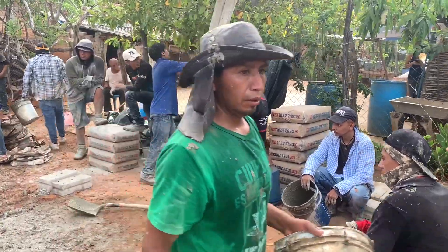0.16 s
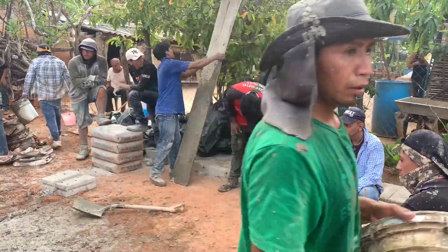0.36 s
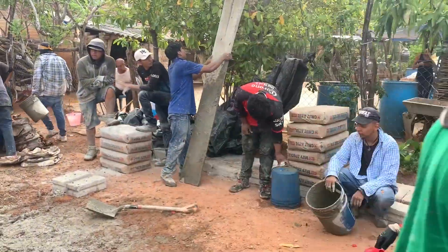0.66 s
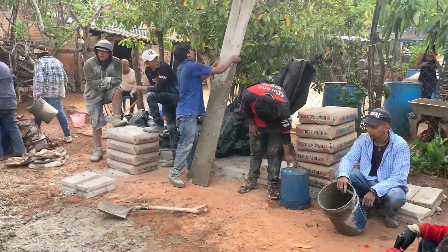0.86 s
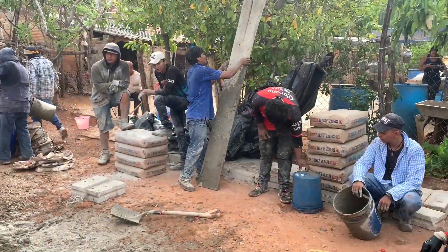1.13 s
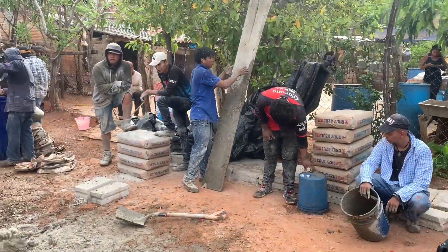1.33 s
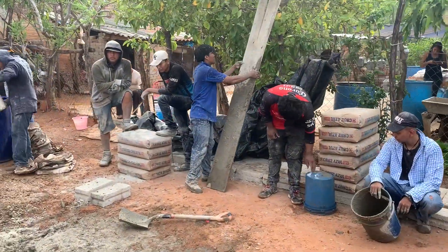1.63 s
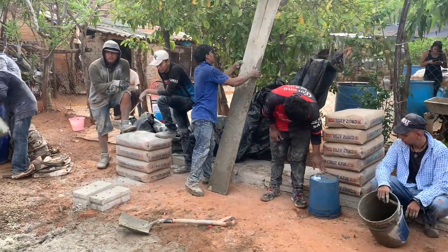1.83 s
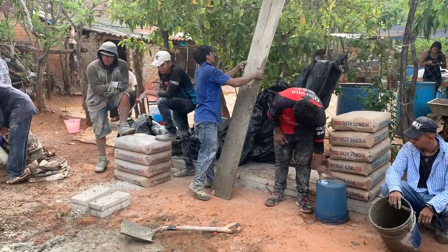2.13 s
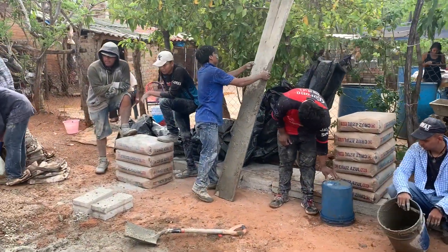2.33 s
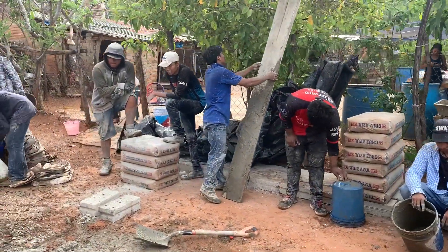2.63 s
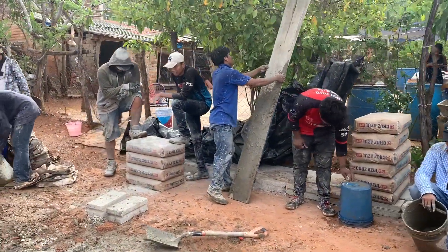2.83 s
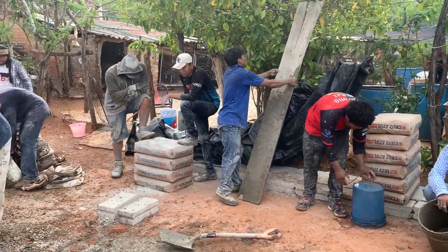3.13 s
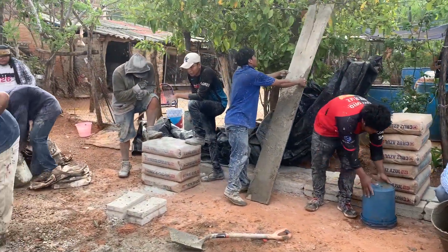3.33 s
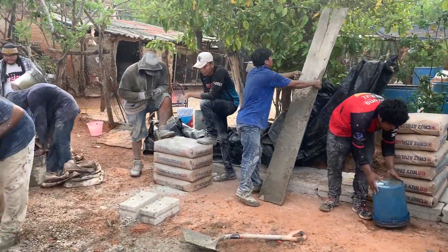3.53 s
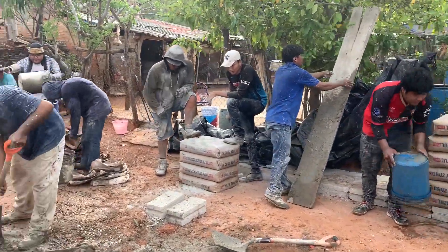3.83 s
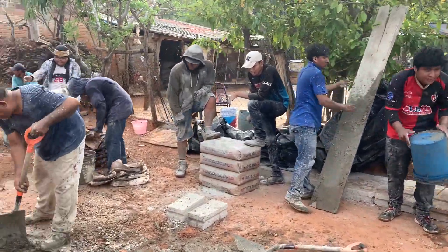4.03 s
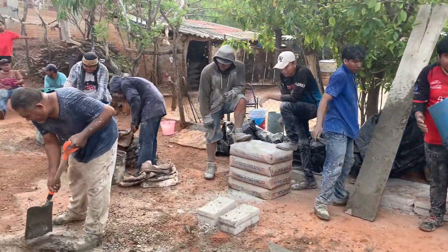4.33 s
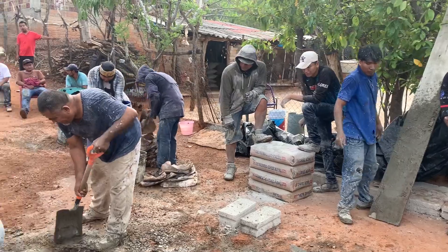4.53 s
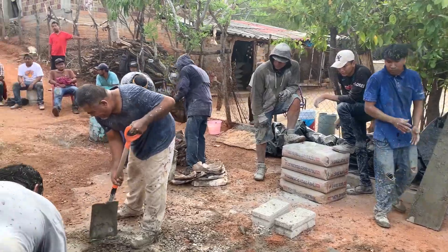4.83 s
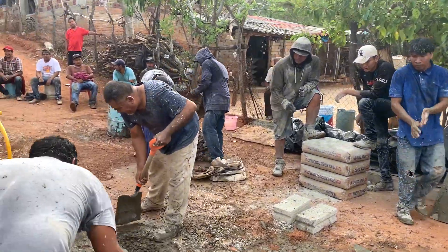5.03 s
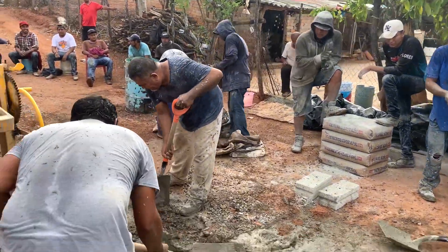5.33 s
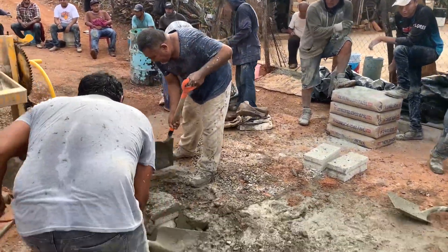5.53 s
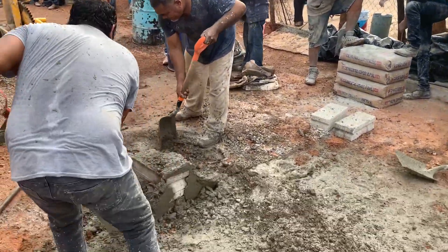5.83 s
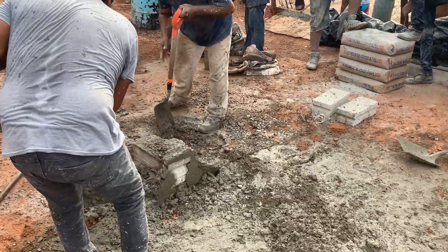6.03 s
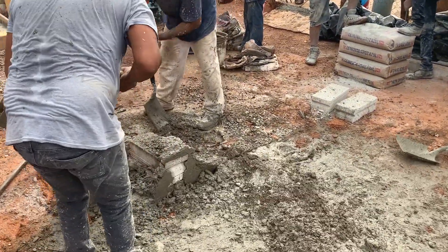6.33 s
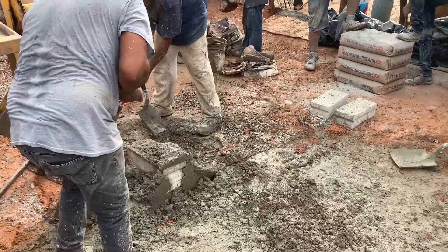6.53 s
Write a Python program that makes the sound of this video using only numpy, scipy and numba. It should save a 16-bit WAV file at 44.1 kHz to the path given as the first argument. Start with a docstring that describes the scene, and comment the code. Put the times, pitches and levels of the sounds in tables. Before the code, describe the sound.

Close shovelling in wet concrete mix on open ground: a short scrape, a pause, then crackling clusters of grit, clicking stones and damped blade clanks. Long rough drags follow, then very sharp stone cracks, a soft low slump of mix, and a few last chops. An engine and rotating drum drone evenly underneath. Captured on a phone in stereo, dry, with loud strokes briefly pushing the level down.

```python
"""Shovels in wet gravel mix

Steel shovels scrape and chop through gravel on bare ground; a mixer's engine drones to one side.
Scrapes are grainy noise in blade and grit colours, stones are short bursts, chops drive damped blade modes.
Engine, drum and heap are shaped noise. The bass is alike in both channels; the shovels' channel lag
shrinks as a phone turns toward them, and its gain control ducks loud moments.
"""
import sys
import numpy as np
from scipy import signal
from scipy.fft import rfft, irfft, next_fast_len
from scipy.io import wavfile
from scipy.ndimage import uniform_filter1d, minimum_filter1d, map_coordinates
from numba import njit

SR = 44100
rng = np.random.default_rng(int(sys.argv[2]) if len(sys.argv) > 2 else 0)


def to_wav(s):
    """Save 16-bit WAV."""
    ch = np.atleast_2d(s).T  # columns
    pcm = np.round(np.clip(ch, -1, 1) * 32767)  # PCM
    wavfile.write(sys.argv[1], SR, pcm.astype(np.int16))


N = 293706

# Engine loudness. Each row: time in seconds, relative level in dB.
ENGINE_DB = [(0, -41.5), (1.5, -42), (2.5, -42), (3.6, -43), (4.04, -41), (4.3, -42.5), (5.14, -40.5),
             (5.5, -41.5), (6.66, -42)]
# Ground rumble. Each row: time in seconds, level in dB.
RUMBLE_DB = [(0, -51), (.9, -48.5), (1.74, -42), (2.2, -52.5), (3.8, -50), (4.2, -49), (4.75, -51),
             (5.2, -46), (5.53, -49), (6.66, -53)]
# Rumble spectrum. Each row: frequency in Hz, relative density in dB per Hz.
GROUND_SPECTRUM = [(20, -34), (40, -11.5), (58, 0), (66, -0.5), (76, 2.5), (95, -7), (120, -41)]
# Exhaust spectrum. Each row: frequency in Hz, relative density in dB per Hz.
EXHAUST_SPECTRUM = [(56, -43), (95, -3), (129, 1), (172, -6), (236, -4), (400, -13.5), (520, -26.5),
                    (880, -120)]
# Exhaust pipe resonances. Each row: frequency in Hz, width in Hz, relative level in dB.
PIPE_MODES = [(117, 27, -0.5), (234, 27, 0.5)]
# Drum spectrum. Each row: frequency in Hz, relative density in dB per Hz.
DRUM_SPECTRUM = [(160, -20), (280, -11.5), (444, 1), (476, -2.5), (563, 1.5), (648, 0), (766, -7),
                 (906, -1), (1100, -2.5), (1280, -1.5), (2150, -20.5), (3610, -19.5), (7900, -41.5),
                 (10300, -76), (17400, -120)]
# Drum shell resonances. Each row: frequency in Hz, width in Hz, relative level in dB.
SHELL_MODES = [(515, 49, 3.5), (585, 220, -1.5), (790, 45, 3), (990, 41, 5), (1081, 68, 4), (1662, 11, 7.5),
               (1560, 49, -26), (2130, 22, 14), (2150, 38, 11)]
# Drum resonances that come forward as the phone turns. Each row: frequency in Hz, width in Hz, relative level in dB.
MOUTH_MODES = [(346, 87, -3), (779, 28, 3)]
# Gain of those resonances. Each row: time in seconds, gain in dB.
FACING_DB = [(0, -20), (3.5, -12), (4.3, -1.5), (5.5, 0.5), (6.66, 3.5)]
SURGE_DB = 0.4

# Heavy loads landing on the heap. Each row: start in seconds, relative level in dB.
DUMPS = [(5.098, -36.5), (5.172, -33.5)]
# Heap spectrum. Each row: frequency in Hz, relative density in dB per Hz.
HEAP_SPECTRUM = [(60, -30), (130, -2), (380, -4), (800, -10), (1500, -30)]
DUMP_RISE_S, DUMP_T60_S = 0.008, 0.29

# Farther shovelling. Each row: time in seconds, then relative levels in dB of grit, blade and load.
FAR_DB = [(0, -40, -58, -58), (.37, -49.5, -69.5, -63), (.62, -48, -66, -59), (.9, -47.5, -57, -49.5),
          (1.24, -50.5, -66, -57.5), (1.5, -45.5, -49.5, -44.5), (1.74, -47, -56, -50),
          (2.15, -40.5, -57, -57), (2.55, -50.5, -60, -49), (2.9, -48.5, -62.5, -56.5),
          (3.62, -47.5, -61, -50), (3.95, -38, -55, -50), (4.2, -48.5, -60, -45.5), (4.45, -45, -64, -53.5),
          (4.98, -49, -58.5, -53), (5.4, -46.5, -60, -53), (5.95, -46.5, -57.5, -49), (6.2, -42, -63, -57),
          (6.66, -47.5, -63.5, -55)]
# Shovel scrapes. Each row: start and end in seconds, relative grit level in dB at start and at end,
# blade level in dB over the grit, load level in dB over the grit.
SCRAPES = [(0.0, 0.078, -31.5, -53, -22, -21), (0.132, 0.16, -33, -35, -22, -36),
           (0.394, 0.454, -28.5, -26.5, -24, -21.5), (0.468, 0.574, -24, -35.5, -21.5, -23.5),
           (0.81, 0.843, -40, -35.5, -9, -10.5), (1.47, 1.473, -42, -33, -18, -8),
           (1.5, 1.67, -46, -58, -11, 3.5), (1.792, 1.89, -37, -34.5, -12, -8.5),
           (1.888, 1.94, -29, -29, -14.5, -13), (1.962, 1.99, -37.5, -35, -13, -13.5),
           (2.003, 2.03, -28, -27.5, -16, -16), (2.048, 2.07, -23.5, -26, -18.5, -21.5),
           (2.188, 2.238, -32, -28, -18, -21), (2.248, 2.383, -34.5, -37.5, -16.5, -16),
           (2.405, 2.429, -37, -37, -19, -24), (2.451, 2.47, -28.5, -39, -16, -28),
           (2.941, 3.064, -32.5, -30.5, -18, -21), (3.079, 3.243, -32.5, -30, -16.5, -13.5),
           (3.262, 3.277, -28, -29, -12.5, -14), (3.285, 3.315, -24, -23.5, -15.5, -15.5),
           (3.327, 3.388, -26, -25.5, -16, -15), (3.394, 3.509, -25, -25, -15, -17.5),
           (3.525, 3.567, -25, -33, -14.5, -11.5), (3.66, 3.735, -36.5, -31.5, -20, -18),
           (3.772, 3.785, -29, -25.5, -22, -25), (3.802, 3.825, -23.5, -22, -20, -24),
           (3.834, 3.883, -24, -28.5, -18.5, -23), (4.473, 4.524, -36, -28, -35, -34),
           (4.54, 4.582, -27, -28, -30, -36), (4.612, 4.632, -27, -30, -24, -30),
           (4.653, 4.7, -31.5, -28.5, -22, -34), (4.707, 4.736, -24, -24, -16.5, -19),
           (4.745, 4.795, -24, -22.5, -15.5, -15), (4.808, 4.835, -24.5, -32, -10.5, -13),
           (4.851, 4.886, -34.5, -42.5, -7.5, -10), (4.906, 4.958, -32.5, -51, -8, -8),
           (5.095, 5.142, -25.5, -27, -19.5, -13), (5.176, 5.215, -28.5, -35, -11, -10.5),
           (5.218, 5.298, -35, -39, -12, -9.5), (5.674, 5.732, -38, -35, -40, -32),
           (5.74, 5.768, -39, -32.5, -18, -13), (5.789, 5.85, -36, -42.5, -27, -26),
           (6.128, 6.159, -37, -36, -37, -36)]
# Rows: grit, blade, load.
BITE_DB_PER_S, LIFT_DB_PER_S = [[1600], [1300], [1000]], [[740], [800], [500]]

# Loud stones struck by the blade. Each row: time in seconds, relative peak in dB.
STONES = [(0.1287, -30), (0.395, -27), (0.4, -21), (0.477, -17), (0.825, -26), (1.4815, -27), (1.534, -29),
          (1.875, -18), (1.901, -18), (1.9325, -24), (2.0055, -17.5), (2.019, -19), (2.062, -23),
          (2.07, -25), (2.112, -23), (2.1293, -32), (2.1926, -19.5), (2.206, -24), (2.2265, -21),
          (2.2785, -24), (2.351, -21), (2.4444, -21), (2.9438, -26), (2.954, -30), (2.988, -22),
          (2.990, -20), (3.084, -18), (3.116, -21), (3.1597, -21), (3.2, -24), (3.207, -16), (3.262, -27),
          (3.288, -15), (3.386, -16), (3.451, -22), (3.4985, -14), (3.512, -18), (3.678, -23),
          (3.6833, -25), (3.764, -16), (3.796, -19), (3.8005, -21), (3.8155, -12), (3.8198, -11),
          (3.8223, -8.5), (3.824, -4), (3.8446, -12), (3.853, -22), (3.8585, -16), (3.872, -14),
          (3.9653, -26), (4.184, -32.5), (4.3427, -29), (4.4347, -24), (4.478, -20), (4.4925, -26),
          (4.505, -18), (4.5088, -8.5), (4.512, -17), (4.5625, -19), (4.570, -14), (4.578, -20),
          (4.597, -25), (4.612, -23), (4.621, -21), (4.658, -19), (4.7075, -12), (4.717, -16),
          (4.7614, -8.5), (4.7645, -18), (4.7795, -20), (4.8413, -24), (4.8856, -25), (4.9053, -26),
          (4.908, -22), (5.088, -20), (5.105, -14.5), (5.1414, -18), (5.2286, -22), (5.6748, -15.5),
          (5.684, -25), (5.703, -21), (5.7414, -19), (5.7517, -20), (5.7569, -18), (5.7587, -10)]
STONE_T60_S, STONE_RISE_S, SNAP_T60_S = 0.022, 0.00018, 0.005
SNAP_DB = 6  # first crack over the rattle
STONE_DULL_DB = -10  # a stone rings the blade less than the scrape does
STONE_DARK_DB = 2  # coarse part of a stone over its fine part
PEBBLES, PEBBLE_DB, PEBBLE_SPREAD_DB = 260, -2.5, 2.5  # offset and spread over the grit of the moment

# Grit spectrum. Each row: frequency in Hz, relative density in dB per Hz.
GRIT_SPECTRUM = [(7850, -79), (8050, -0.5), (9500, 2), (11000, 3), (13000, 2.5), (15000, -0.5),
                 (15700, -5.5), (16300, -58)]
# Grain fineness. Each row: time in seconds, fine grains over coarse ones in dB.
FINENESS_DB = [(0, -1), (.5, 1), (1.3, -3), (1.8, 2.5), (2.3, 1.5), (2.8, -1.5), (3.1, 1.5), (3.8, -5.5),
               (4.6, -2), (5.2, -1), (5.8, -1), (6.66, -3.5)]

# Blade spectrum. Each row: frequency in Hz, relative density in dB per Hz.
BLADE_SPECTRUM = [(2200, -63), (2900, 0), (3500, 7), (4500, 3.5), (5500, 4.5), (7900, 5.5), (8050, -57)]
# Load sliding on the blade. Each row: frequency in Hz, relative density in dB per Hz.
PAN_SPECTRUM = [(250, -21), (900, -1.5), (1350, 2), (1700, 0.5), (2300, 1), (2800, -4), (3600, -11.5)]
# Blade resonances under the load. Each row: frequency in Hz, width in Hz, relative level in dB.
SING_MODES = [(1070, 140, 0.5), (1590, 22, 3.5), (1750, 100, 1), (3065, 115, -0.5), (4330, 290, 1.5)]
# Turn of the phone. Each row: time in seconds, lag of the right port for the blade in ms.
TURN_MS = [(0, 0.3), (2, 0.28), (3.1, 0.27), (3.85, 0.19), (4.7, 0.1), (5.2, 0.047), (6.66, 0.018)]
GRAIN_DB = 1.8  # grain unevenness of the scraping noise
PATCHY_DB = 2.6  # random time-frequency unevenness of its spectrum

# Blade edge hitting the ground. Each row: time in seconds, relative level in dB.
CHOPS = [(1.975, -33), (2.004, -29), (2.193, -35), (2.445, -34), (2.533, -40), (3.084, -25.5), (3.147, -29),
         (3.1735, -23), (3.289, -25), (3.5, -33), (3.7645, -34), (3.823, -25), (3.873, -33), (4.423, -32),
         (4.4935, -32), (4.626, -31), (4.708, -26), (4.759, -23), (4.779, -26), (4.9065, -28), (4.991, -35),
         (5.0885, -36), (5.1406, -19.5), (5.181, -28), (5.198, -33), (5.6754, -26.5), (5.742, -36),
         (5.7584, -22), (5.8012, -38), (5.953, -33), (6.019, -31)]
# Damped blade modes. Each row: nominal frequency in Hz, relative level in dB, T60 in seconds.
STEEL_MODES = [(1435, -1, 0.04), (1585, -4, 0.04), (1705, 5, 0.045), (2270, 0, 0.018), (2950, -1, 0.013),
               (3790, -1, 0.02), (4600, -5, 0.018)]
CRUNCH_T60_S, CRUNCH_RISE_S, CRUNCH_DB, RING_DB = 0.05, 0.00062, -8, -13
TICK_T60_S, TICK_DB = 0.009, 10  # first touch of steel on stone, over the crunch

# Dragged edge sets the blade singing. Each row: start and end in seconds, relative level in dB.
RASPS = [(3.465, 3.56, -45), (4.708, 4.8, -43), (6.017, 6.04, -45)]
RASP_HZ, RASP_WIDTH_HZ = 1680, 220

TOP_HZ = 16400  # band limit


def amp(db):
    """Amplitude ratio of a level in dB."""
    return 10 ** (np.asarray(db) / 20)


def unit(x):
    """x scaled to RMS 1."""
    return x / np.sqrt(np.mean(x ** 2) + 1e-20)


def along(points, hz):
    """Levels in dB between (Hz, dB) points on a log axis, -120 dB outside."""
    point_hz, point_db = np.transpose(points)
    return np.interp(np.log(hz + 1), np.log(point_hz + 1), point_db, -120, -120)


def curves(rows):
    """One value per sample for each column after the time."""
    time_s, *columns = np.transpose(rows)
    return [np.interp(np.arange(N) / SR, time_s, column) for column in columns]


def wobble(rate_hz):
    """A smooth random curve with rate_hz knots a second."""
    knots = rng.standard_normal(int(N * rate_hz / SR) + 4)
    return map_coordinates(knots, [np.arange(N) * rate_hz / SR])


def filtered(x, response):
    """x times a response of frequency."""
    m = next_fast_len(N + 8192)
    return irfft(rfft(x, m) * response(np.fft.rfftfreq(m, 1 / SR)), m)[..., :N]


def colour(points):
    """A spectrum response scaled to mean power 1 over the frequency bins."""
    return lambda hz: amp(along(points, hz)) / np.sqrt(np.mean(amp(2 * along(points, hz))))


def resonant(spectrum, modes, base):
    """A broad spectrum with resonances standing on a base power."""
    def response(hz):
        peaks = sum(amp(2 * db) / (1 + (2 * (hz - c) / width) ** 2) for c, width, db in modes)
        return amp(along(spectrum, hz)) * np.sqrt(base + peaks)
    return response


def ports(noises, lag_ms, twist_rad, share, patchy_db):
    """Two ports: alike in the bass, above it phase-shifted and partly unrelated, with a patchy spectrum."""
    hz, t, (direct, a, b) = signal.stft(noises, SR, nperseg=512)
    patches = uniform_filter1d(rng.standard_normal(a.shape), size=5, axis=0)
    patches = amp(patchy_db * unit(uniform_filter1d(patches, size=7, axis=1)))
    apart = np.clip((hz[:, None] - 600) / 850, 0, 1) ** 2.82
    lag_s = np.interp(t, np.arange(N) / SR, lag_ms) / 1000
    half_rad = apart * (np.pi * hz[:, None] * lag_s + twist_rad / 2)
    stray = np.clip(share, 0, 1) * apart
    mid = np.sqrt(1 - stray) * np.cos(half_rad) * direct + np.sqrt(stray / 2) * a
    side = np.sqrt(1 - stray) * np.sin(half_rad) * 1j * direct + np.sqrt(stray / 2) * b
    left_right = [(mid + side) * patches, (mid - side) * patches]
    return signal.istft(left_right, SR, nperseg=512)[1][:, :N]


def rumble(surge):
    """Ground rumble: low noise in the ground's spectrum."""
    ground = surge * filtered(rng.standard_normal(N), colour(GROUND_SPECTRUM))
    return amp(curves(RUMBLE_DB)[0]) * unit(ground)


def exhaust(surge):
    """Exhaust: steady noise in the resonances of the pipe."""
    noise = rng.standard_normal(N)
    pipe = surge * filtered(noise, resonant(EXHAUST_SPECTRUM, PIPE_MODES, base=0.27))
    return amp(curves(ENGINE_DB)[0] + 1.0) * unit(pipe)


def drum(surge):
    """Load tumbling in the steel drum: noise pulsing with the firing rate rings the shell."""
    firing_hz = 21.0 + 1.2 * wobble(2.3)
    firing = 1 + 0.051 * np.sin(2 * np.pi * np.cumsum(firing_hz) / SR)
    tumble = surge * firing * amp(1.2 * wobble(200))
    load = tumble * rng.standard_normal((2, 3, N))
    shell = filtered(load[0], resonant(DRUM_SPECTRUM, SHELL_MODES, base=0.35))
    mouth = filtered(load[1], resonant([(20, 0), (20000, 0)], MOUTH_MODES, base=0))
    both = unit(shell + amp(curves(FACING_DB)[0]) * mouth)
    lag_ms = np.full(N, .42)
    return ports(amp(curves(ENGINE_DB)[0]) * both, lag_ms, twist_rad=-0.19, share=0.14, patchy_db=1.34)


def engine():
    """Mixer: exhaust, ground rumble and drum share one slight surge in level."""
    surge = amp(SURGE_DB * wobble(9))
    return exhaust(surge) + rumble(surge) + drum(surge)


def dumps():
    """Wet mix slumps onto the heap: low noise that swells fast and dies away."""
    swell = np.zeros(N)
    for start_s, db in DUMPS:
        since_s = np.arange(N) / SR - start_s
        rise = 1 - np.exp(-np.maximum(since_s, 0) / DUMP_RISE_S)
        swell += amp(db - 60 * np.abs(since_s) / DUMP_T60_S) * rise
    return swell * unit(filtered(rng.standard_normal(N), colour(HEAP_SPECTRUM)))


def strokes():
    """Grit, blade and load levels in dB: each scrape bites, drags and lifts over the farther work."""
    t, power = np.arange(N) / SR, amp(2 * np.array(curves(FAR_DB)))
    for start, end, first_db, last_db, blade_db, load_db in SCRAPES:
        near = slice(max(round((start - .1) * SR), 0), round((end + .3) * SR))
        share = np.clip((t[near] - start) / (end - start), 0, 1)
        drag_db = first_db + (last_db - first_db) * share + [[0], [blade_db], [load_db]]
        drag_db -= BITE_DB_PER_S * np.maximum(start - t[near], 0)
        drag_db -= LIFT_DB_PER_S * np.maximum(t[near] - end, 0)
        power[:, near] += amp(2 * drag_db)
    return 10 * np.log10(power)


def cracks(times_s, peak_db):
    """Envelope of struck stones: a sharp snap, a short rattle."""
    t = np.arange(SR // 20) / SR
    blows = np.bincount((times_s * SR).astype(int), amp(peak_db), N)
    decay = amp(-60 * t / SNAP_T60_S) + amp(-SNAP_DB - 60 * t / STONE_T60_S)
    shape = decay * (1 - np.exp(-t / STONE_RISE_S))
    return signal.fftconvolve(blows, shape / shape.max())[:N]


def struck_stones(grit_db):
    """Envelope of the loud stones and of small ones at chance moments, mostly weak."""
    when, size = rng.random((PEBBLES, 2)).T
    pebble_db = grit_db[(when * N).astype(int)] + PEBBLE_DB - PEBBLE_SPREAD_DB * np.log(1 - size)
    return cracks(*np.transpose(STONES)) + cracks(when * N / SR, pebble_db)


def chops():
    """The edge crushes gravel; the crunch drives the damped blade at new strengths each blow."""
    out, t = np.zeros(N + SR), np.arange(SR // 10) / SR
    for start_s, db in CHOPS:
        ring = np.zeros(len(t))
        for hz, mode_db, t60_s in STEEL_MODES:
            chance = rng.standard_normal()
            tone = np.sin(2 * np.pi * hz * (1 + 0.031 * chance) * t)
            ring += amp(mode_db + 2 * chance - 60 * t / t60_s) * tone
        decay = amp(-60 * t / CRUNCH_T60_S) + amp(TICK_DB - 60 * t / TICK_T60_S)
        crunch = decay * (1 - np.exp(-t / CRUNCH_RISE_S)) * np.sign(rng.standard_normal(len(t)))
        rung = signal.fftconvolve(crunch, ring)[:len(t)] / np.linalg.norm(crunch)
        out[round(start_s * SR):][:len(t)] += amp(db + RING_DB) * rung + amp(db + CRUNCH_DB) * crunch
    return out[:N]


def rasps():
    """Rough noise in one blade resonance while the edge drags."""
    t, drag = np.arange(N) / SR, np.zeros(N)
    for start, end, db in RASPS:
        fade_db = LIFT_DB_PER_S[2][0] * np.maximum(t - end, 0)
        drag += amp(db - fade_db) * (t > start)
    sing = lambda hz: 1 / (1 + (2 * (hz - RASP_HZ) / RASP_WIDTH_HZ) ** 2)
    return drag * unit(filtered(rng.standard_normal(N), sing))


def edge_band(hz):
    """Response for chops and rasps: weak below 1200 Hz and above 6000 Hz."""
    return (hz / 1200) ** 2 / (1 + (hz / 1200) ** 2) / (1 + (hz / 6000) ** 4)


def blade(dull, load):
    """Steel blade: scrape and load noise through its resonances, plus chops and rasps."""
    steel = filtered(dull * rng.standard_normal((3, N)), colour(BLADE_SPECTRUM))
    steel += filtered(load * rng.standard_normal((3, N)), colour(PAN_SPECTRUM))
    steel = filtered(steel, resonant([(20, 0), (20000, 0)], SING_MODES, base=0.67))
    steel[0] += filtered(chops() + rasps(), edge_band)
    return ports(steel, curves(TURN_MS)[0], twist_rad=0.69, share=0.29, patchy_db=PATCHY_DB)


def grit(sand, stones):
    """Treble part of the gravel noise, from about 8 kHz up: larger grains sound lower, finer ones higher."""
    bright = sand * rng.standard_normal((2, N))
    stone_gain = amp([[STONE_DARK_DB / 2], [-STONE_DARK_DB / 2]])
    bright = bright + stones * np.sign(rng.standard_normal((2, N))) * stone_gain
    bright = bright * amp(np.outer([-.5, .5], curves(FINENESS_DB)[0]))
    fine = lambda hz: np.pi / 2 * np.clip((hz - 10500) / 3000, 0, 1)
    grains = filtered(bright, lambda hz: [np.cos(fine(hz)), np.sin(fine(hz))]).sum(0)
    # same in both channels, the left nine samples late up to 15900 Hz
    turn = lambda hz: np.exp(1j * np.pi * np.outer([-1, 1], np.minimum(hz, 15900) - 11000) / 4900)
    return filtered(grains, lambda hz: colour(GRIT_SPECTRUM)(hz) * turn(hz))


def shovels():
    """Gravel grinds along the steel: dense grains of uneven size, in clumps."""
    grit_db, blade_db, load_db = strokes()
    stones = struck_stones(grit_db)
    near = np.clip((grit_db + 71.0) / 26, .3, 1)  # faint, far strokes blur; loud ones keep their grain
    clumps = 0.98 * wobble(45) + 0.2 * wobble(180)
    sand_db = clumps + 1.77 * np.array([wobble(120), wobble(120)]) + 1.7 * wobble(700)
    coarse = amp(near * (1.83 * clumps + GRAIN_DB * wobble(300)))
    dull = amp(blade_db) * coarse + stones * amp(blade_db - grit_db + STONE_DULL_DB)
    return grit(amp(grit_db + near * sand_db), stones) + blade(dull, amp(load_db) * coarse)


def scene():
    """Engine, slumping heap and shovels together."""
    return engine() + dumps() + shovels()


@njit
def release(need_db, db_per_sample):
    """The cut follows a rise at once and lets go at a steady rate."""
    cut_db = need_db.copy()
    for i in range(1, len(cut_db)):
        cut_db[i] = max(cut_db[i], cut_db[i - 1] - db_per_sample)
    return cut_db


def record(dry):
    """Gain control ducks shortly after loud moments, a limiter holds peaks, a band limit cuts the top."""
    power = np.abs(uniform_filter1d(np.mean(dry ** 2, 0), SR // 100))
    level_db = 10 * np.log10(power + 1e-12)
    cut_db = release(np.maximum(level_db + 17.5, 0), 35 / SR)
    late_cut_db = uniform_filter1d(np.roll(cut_db, SR // 150), SR // 200)
    ducked = dry * amp(-late_cut_db)
    need = np.minimum(1, .8 / (np.abs(ducked).max(0) + 1e-9))
    limiter = uniform_filter1d(minimum_filter1d(need, size=129), size=64)
    return filtered(ducked * limiter, lambda hz: hz < TOP_HZ)


dry = scene()
out = record(dry)
to_wav(out)
```